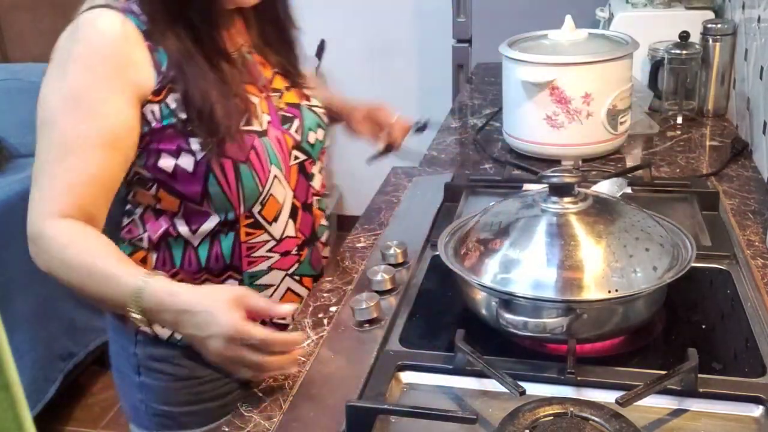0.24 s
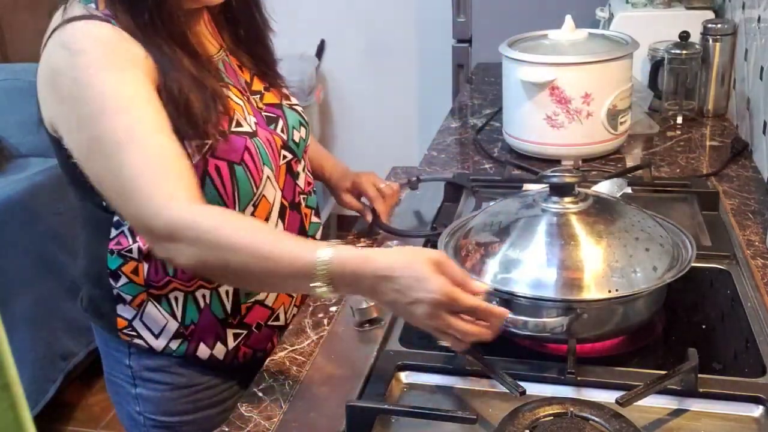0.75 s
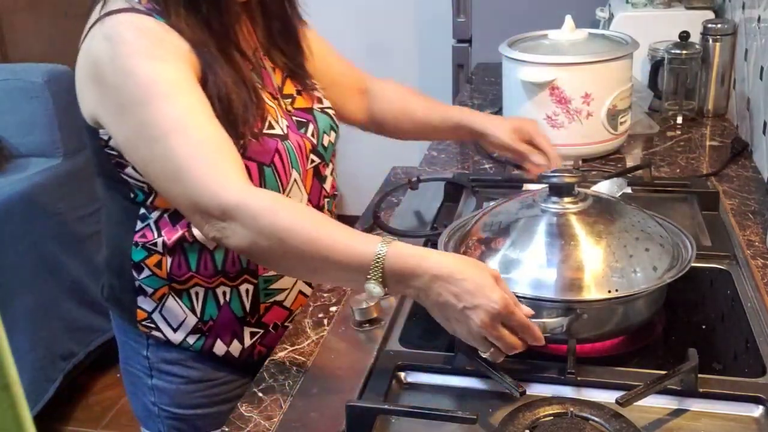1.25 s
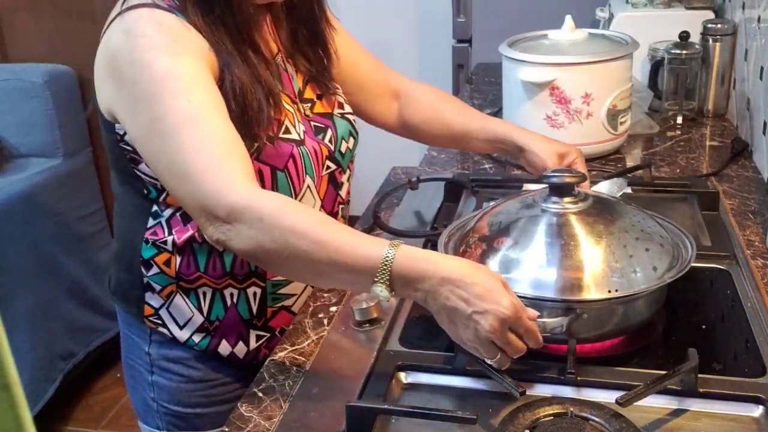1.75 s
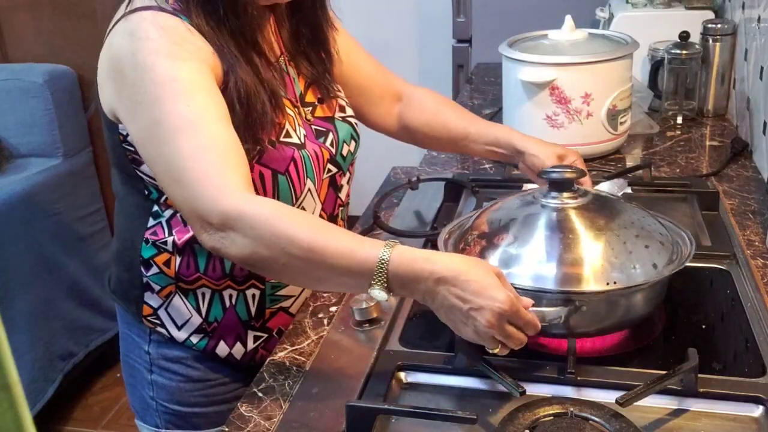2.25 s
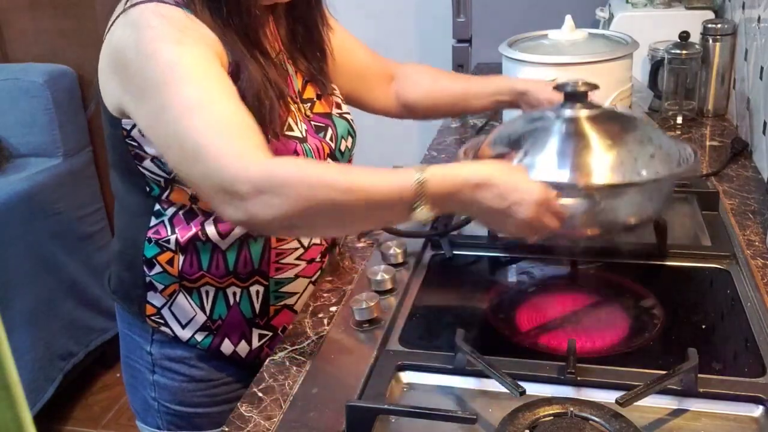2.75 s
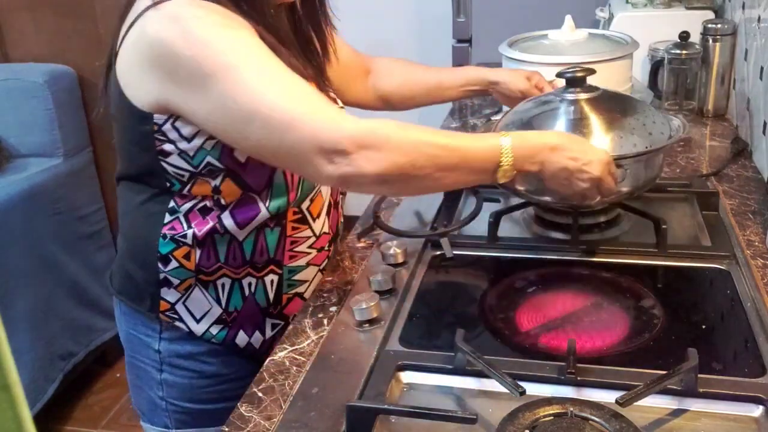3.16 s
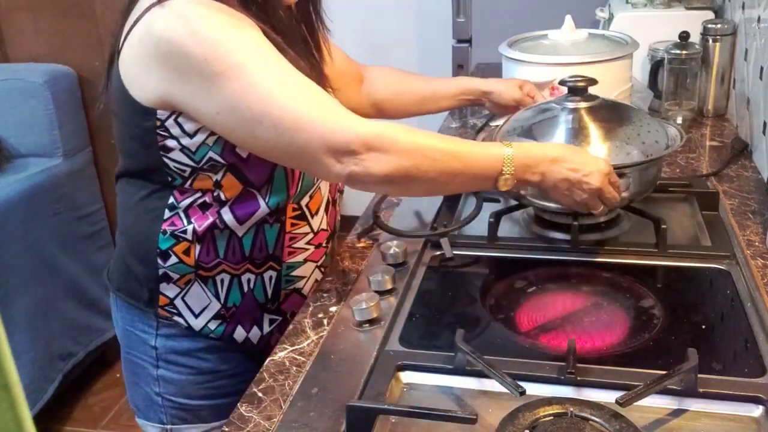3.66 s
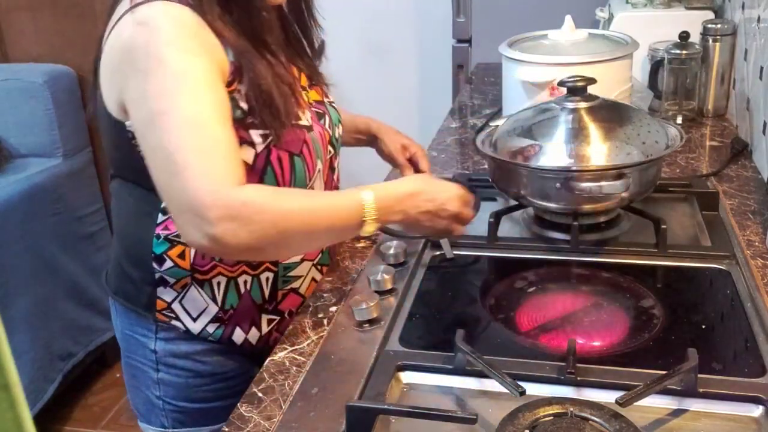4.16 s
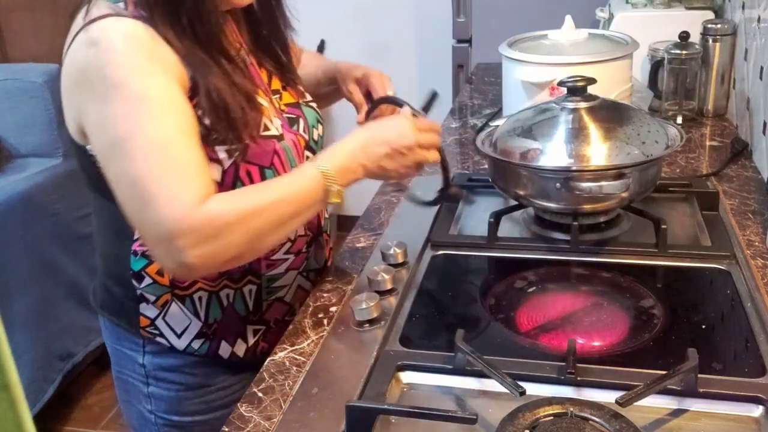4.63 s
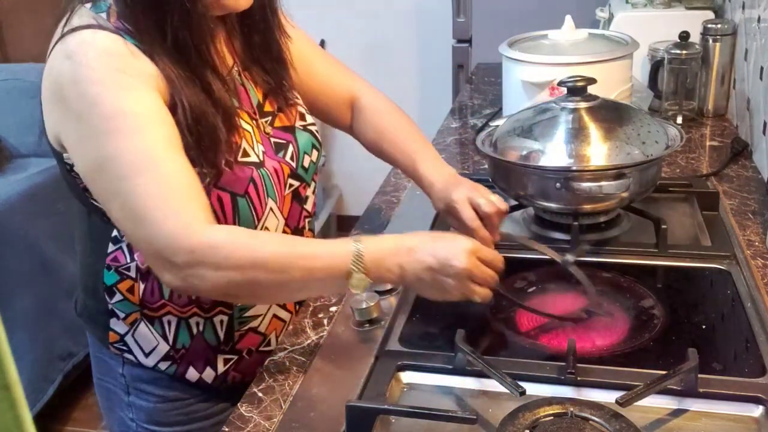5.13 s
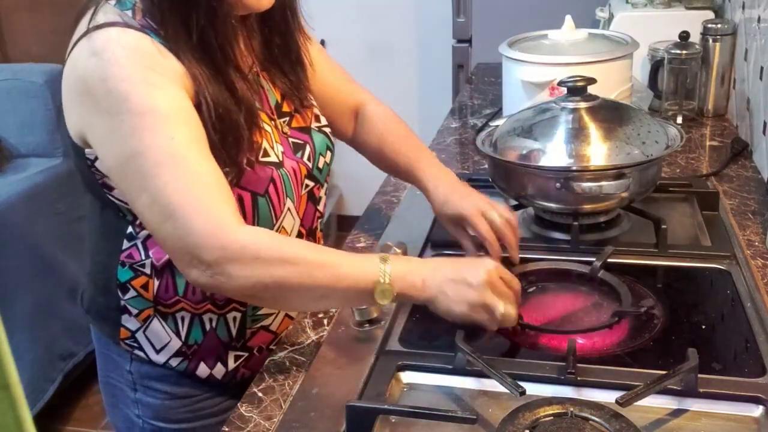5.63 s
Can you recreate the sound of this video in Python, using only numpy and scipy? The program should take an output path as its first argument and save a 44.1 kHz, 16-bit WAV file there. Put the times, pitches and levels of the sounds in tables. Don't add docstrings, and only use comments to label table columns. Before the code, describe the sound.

In a small tiled kitchen, a steel pot simmers with low, thudding bubbles and puffs of lid steam. An iron ring is pushed aside with a dull rattle. The pot is lifted, its boil dies away, and it lands with muffled knocks. The ring is picked up with clinks and a tap, then drops, bounces and falls flat with loud hard clanks. Close stereo microphone, slightly dull top, low room hum.

```python
import sys
import numpy as np
from scipy import signal
from scipy.fft import rfft, irfft, next_fast_len
from scipy.io import wavfile
from scipy.ndimage import uniform_filter1d

SR = 44100
rng = np.random.default_rng(int(sys.argv[2]) if len(sys.argv) > 2 else 0)


def materialize(psi):
    bounded = np.clip(np.atleast_2d(psi).T, -1, 1)
    quanta = np.round(bounded * 32767).astype(np.int16)
    wavfile.write(sys.argv[1], SR, quanta)


def decibels_to_gain(level_db):
    exponent = np.asarray(level_db, float) / 20
    return 10 ** exponent


N = 259749
TIME = np.arange(N) / SR


def evened(x):
    return x / np.sqrt(np.mean(x ** 2) + 1e-20)


def read(points, hz):
    f, value = np.transpose(points)
    return np.interp(np.log(hz + 1), np.log(f + 1), value)


def resonate(x, hz, width):
    r = np.exp(-np.pi * width / SR)
    return 2 * signal.lfilter([1 - r], [1, -r * np.exp(2j * np.pi * hz / SR)], x).real


def ringing(hz, db, t60, drive):
    t = np.arange(len(drive)) / SR
    phase = rng.random((len(hz), 1))
    decay = decibels_to_gain(db[:, None] - 60 * t / t60[:, None])
    modes = decay * np.sin(2 * np.pi * (hz[:, None] * t + phase))
    response = modes.sum(0) * np.minimum(t / 0.0011, 1)
    out = signal.oaconvolve(drive, response)[:len(t)]
    return out / np.sqrt(np.mean(out[:900] ** 2))


HOB_MODES = [104, 160, 243, 275, 314, 360, 390, 412, 445, 473, 516, 553, 583, 629]
HOB_UPPER_MODES = [690, 733, 776, 822, 880, 930, 1005, 1052, 1100, 1161, 1240, 1305, 1380, 1450]
# (frequency [Hz], T60 [s])
PANEL_DECAY = [(80, .13), (300, 0.092), (700, 0.061), (1400, 0.11)]


def knocks(rows, body, crack_db, ring_db, hold, chatter, rattle_db=-25, rattle_s=0.074,
           rise=0.0027, spread=.002):
    out = np.zeros(N + SR)
    panel, metal, colour = body
    t = np.arange(SR // 4) / SR
    hz = np.fft.rfftfreq(SR // 4, 1 / SR)
    fade = np.exp(-t / np.clip(chatter, .001, .06))
    release = np.minimum((t[-1] - t) / .06, 1)
    metal_hz, metal_db, metal_t60 = np.repeat(metal, 3, axis=0).T
    metal_hz = metal_hz * (1 + spread * rng.standard_normal(len(metal_hz)))
    metal_t60 = np.clip(0.45 * metal_t60, .02, .45)
    panel_hz = np.tile(HOB_MODES + HOB_UPPER_MODES, 2)
    slow = np.repeat([0, 1], len(panel_hz) // 2)
    panel_db = read(panel, panel_hz) - 12 * slow
    panel_t60 = np.clip(hold * read(PANEL_DECAY, panel_hz), .02, .25) * 1.7 ** slow
    for s, thump_db, clink_db, bright_hz in rows:
        grit = rng.standard_normal(len(t))
        contacts = rng.random(len(t)) < 700 / SR
        drive = (t == 0) + .2 * fade * grit * contacts
        thump = ringing(panel_hz, panel_db, panel_t60, drive)
        thump *= np.minimum(t / 0.0031, 1)
        spot_db = 11 * np.exp(-((hz - bright_hz) / 390.0) ** 2)
        spectrum = rfft(grit) * decibels_to_gain(read(colour, hz))
        crack = evened(irfft(spectrum * decibels_to_gain(spot_db), len(t)))
        rattle = evened(irfft(spectrum * decibels_to_gain(spot_db / 2), len(t)))
        crack = fade * crack + decibels_to_gain(rattle_db) * np.exp(-t / rattle_s) * rattle
        crack *= np.minimum(t / rise, 1)
        ring = ringing(metal_hz, metal_db + np.interp(metal_hz, hz, spot_db) * .7, metal_t60, drive)
        clink = decibels_to_gain(ring_db) * ring + decibels_to_gain(crack_db) * crack
        out[round(s * SR):][:len(t)] += (decibels_to_gain(thump_db) * thump + decibels_to_gain(clink_db) * clink) * release
    return out[:N]


# panel colour (frequency [Hz], level [dB]),
# metal modes (frequency [Hz], level [dB], T60 [s]), crack colour (frequency [Hz], level [dB]).
DROP_KNOCKS = [
    (5.311, -10.5, -23, 2946),
    (5.324, -15.5, -36, 1770),
    (5.335, -35, -52.5, 4400),
    (5.381, -42.5, -52, 2900),
]
DROP_BODY = [
    [(70, -21.5), (110, -11.5), (200, -0.5), (250, -8), (360, -6), (480, -0.5), (620, -3), (735, -6.5), (825, -9), (1005, -13.5), (1080, -17.5), (1165, -13.5), (1300, -54.5), (1820, -43)],
    [(1818, -2.5, 0.27), (1976, -6, .15), (2185, -1, .4), (2614, 0, 0.38), (2976, 4, 0.17), (3680, -2.5, 0.31), (4900, -4, .3), (5300, -14, .3), (5670, 5, 0.17), (6384, -2, 0.24), (6655, -14.5, .6), (7640, -8.5, 0.31)],
    [(820, -50), (1450, -31.5), (1800, -1.5), (2250, -16), (2850, -10), (3300, -13), (4650, -7), (6610, -7.5), (7520, -6), (8700, -17)],
]
BOUNCE_KNOCKS = [
    (5.4565, -13, -24, 6600),
    (5.478, -18.5, -35, 1850),
    (5.487, -21, -44, 4500),
    (5.495, -32.5, -44, 6700),
    (5.507, -30.5, -40.5, 2400),
]
BOUNCE_BODY = [
    [(70, -17.5), (110, -1), (200, -10.5), (250, 0.5), (360, 1), (480, -1), (640, -2.5), (735, -8), (825, -2.5), (1005, -17.5), (1165, -9.5), (1300, -36.5), (1820, -40)],
    [(1740, -2, 0.52), (1850, -4.5, .15), (2730, 2.5, 0.28), (2900, 8, 0.33), (3530, -4, .5), (4820, 9, .2), (5250, 1, .2), (5330, -10, 0.99), (6600, 2, 0.16), (6800, -6.5, 0.34), (7200, -16.5, 0.24), (7200, -5.5, .6), (7300, 3.5, .3)],
    [(820, -43), (1450, -16), (1800, -7.5), (2250, -16), (2850, -8.5), (3300, -12), (4300, -11), (6610, -14.5), (7520, -9), (8700, -14)],
]
REST_KNOCKS = [
    (5.7465, -48, -61, 3500),
    (5.759, -13, -21, 6500),
    (5.768, -22.5, -27.5, 6650),
    (5.778, -24, -31, 7150),
    (5.8, -26.5, -36, 6550),
    (5.809, -24, -37.5, 6650),
]
REST_BODY = [
    [(70, -11), (165, -12.5), (200, -14), (240, 0.5), (311, -33), (358, 2), (430, -9), (515, -1), (730, -9.5), (870, -5), (1050, -10.5), (1400, -43.5), (1820, -35.5)],
    [(1920, -2.5, .4), (2220, -11, 0.47), (2580, -7.5, 0.34), (3023, -13.5, .5), (3660, -13, .5), (4600, -16, .7), (4870, -27, 0.36), (5780, -16, .5), (5862, -4, .3), (6550, -7.5, 0.13), (6670, 6.5, 0.21), (7370, -6, 0.35), (7504, -26, .5)],
    [(820, -46), (1400, -4), (2230, -7), (2810, -7.5), (3120, -8.5), (5250, -3.5), (6810, -6.5), (7640, 3.5), (8700, -58)],
]


def ring_dropped():
    drop = knocks(DROP_KNOCKS, DROP_BODY, 12.7, -8.5, 0.91, 0.0025, rise=0.0012, spread=0.0066)
    bounce = knocks(BOUNCE_KNOCKS, BOUNCE_BODY, 9.1, -15.5, 0.68, 0.0044)
    rest = knocks(REST_KNOCKS, REST_BODY, 8.2, -11, 0.67, 0.0038, rise=0.0015)
    return drop + bounce + rest


TOUCH_KNOCKS = [
    (3.237, -47, -64, 5160),
    (3.264, -40.5, -68, 5580),
]
TOUCH_BODY = [
    [(88, -42), (150, -13.5), (258, -3), (412, -22), (582, -61), (792, -45), (1030, -37.5), (1400, -58), (1820, -78)],
    [(1850, -19, .2), (2223, -11, 0.17), (2970, -7, 0.17), (3900, -3.5, 0.15), (4565, -14, .2), (4900, -5.5, .25), (5140, -5, .3), (5561, -18, .3), (5970, -14.5, .2), (6250, 1.5, 0.2), (6480, -4, 0.32), (6702, -12, .23), (7477, -3, .3)],
    [(820, -58), (1400, -29.5), (2960, -17), (3440, -23), (5090, 13), (7590, -6), (8500, -42)],
]
DOWN_KNOCKS = [(3.528, -28.5, -49.5, 6950), (3.539, -26.5, -41, 6700), (3.553, -14.5, -40.5, 3040),
               (3.566, -23.5, -37.5, 6700), (3.584, -31.5, -40, 7300), (3.628, -35, -40.5, 7100),
               (3.639, -32.5, -51, 3340), (3.676, -27.5, -47, 6500), (3.719, -27, -38.5, 7200),
               (3.731, -19.5, -33.5, 6730), (3.746, -28, -54, 3300), (3.776, -34.5, -43.5, 7300),
               (3.813, -49, -49.5, 5950)]
DOWN_BODY = [
    [(70, -8), (170, -19.5), (315, 2), (353, -7), (395, -1.5), (470, -13.5), (580, -23), (711, -22.5), (1000, -27), (1400, -38.5), (1820, -70)],
    [(3040, -6.5, 0.41), (3220, -16, .1), (4500, -0.5, 0.23), (5055, -0.5, .4), (5669, -1, 0.57), (5900, -2.5, .35), (6550, -1.5, .5), (6750, -9, .35), (7000, -11.5, 0.55), (7060, -14, 0.44), (7330, 2.5, 0.46), (7620, -4.5, 0.83)],
    [(820, -38), (1400, -12), (2100, -17), (2960, -15), (4720, -15), (5060, -11.5), (7020, -10.5), (7820, -4), (8700, -62)],
]
SETTLE_KNOCKS = [
    (3.931, -29, -51.5, 7400),
    (4.004, -58.5, -96, 2200),
]
SETTLE_BODY = [
    [(88, -39), (160, -34.5), (243, 7), (314, -2), (393, 8.5), (535, -31), (730, -23.5), (880, -37), (1050, -26.5), (1400, -41), (1820, -86)],
    [(2970, -8, 0.29), (5920, -16, 0.123), (6740, 1, 0.3), (6900, -3.5, 0.54), (7400, -11, 0.17)],
    [(820, -43), (1400, -25), (3650, -8.5), (6730, -2), (8500, -22)],
]


def pot_set_down():
    touch = knocks(TOUCH_KNOCKS, TOUCH_BODY, 0, -0.5, 0.87, 0.026, rise=0.0045, spread=0.015)
    down = knocks(DOWN_KNOCKS, DOWN_BODY, 0, -10, 0.54, 0.026, rise=.007, spread=0.0055)
    settle = knocks(SETTLE_KNOCKS, SETTLE_BODY, 0, -10.5, 2.1, 0.0053, rise=0.0038)
    return touch + down + settle


ASIDE_KNOCKS = [
    (0.76, -26.5, -29.5, 7230),
    (0.803, -22, -40.5, 3100),
    (0.813, -25, -51.5, 1680),
    (0.834, -30, -42, 6780),
    (0.836, -43.5, -49, 3350),
    (0.897, -27, -51, 6900),
]
ASIDE_BODY = [
    [(70, -13.5), (139, 0), (208, -6), (285, -0.5), (400, -4), (527, -8), (767, -10.5), (1400, -41.5), (1820, -68.5)],
    [(1707, -13.5, 1.1), (2740, -13, 0.39), (3100, -21, 0.29), (3483, -16.5, 0.67), (3960, -13.5, 1), (4420, -10, .45), (4495, -4.5, 0.7), (4970, -9.5, .5), (5450, -15.5, 1.2), (5390, -7.5, 0.52), (6100, -6.5, 0.5), (6330, -8, .5), (6754, -4, 0.4), (7020, -9, 0.27), (7230, 5, 0.22)],
    [(710, -43.5), (1200, -8), (3800, -9), (4370, -12.5), (5080, -11.5), (7010, -6), (7620, 2), (8700, -72)],
]


def ring_pushed_aside():
    return knocks(ASIDE_KNOCKS, ASIDE_BODY, -7, 1, 2.37, 0.024, rattle_db=-6.0, rattle_s=0.15, spread=0.0045)


BRUSH_KNOCKS = [
    (4.281, -46.5, -65, 7430),
    (4.292, -38, -59, 7420),
    (4.302, -44, -74, 5400),
    (4.344, -47, -76.5, 2400),
]
BRUSH_BODY = [
    [(88, -41.5), (150, 4), (404, -4), (663, -12), (784, -15.5), (883, -33), (1010, -9.5), (1200, -27.5), (1600, -33), (2080, -81.5)],
    [(2400, -2, 0.62), (3235, -16, 0.27), (3680, -7.5, .2), (4450, -8.5, 0.33), (5330, -18, .22), (5460, 1, .2), (6540, -27.5, .2), (7850, 4.5, .3), (7400, -4.5, .2)],
    [(940, -45), (1600, 7.5), (6250, -3.5), (7650, 5), (8500, -31.5)],
]
UP_KNOCKS = [
    (4.449, -23, -42, 3200),
    (4.456, -23.5, -31.5, 5340),
    (4.462, -22.5, -33, 2600),
    (4.476, -23.5, -48.5, 4600),
    (4.494, -34.5, -62, 4600),
    (4.521, -48.5, -59, 4600),
]
UP_BODY = [
    [(70, -33.5), (150, -7.5), (248, -0.5), (314, -8), (390, 1), (500, -12.5), (703, -10.5), (900, -24.5), (1160, -33), (1400, -41), (1820, -59.5)],
    [(1590, -8.5, 0.44), (2210, -2.5, 0.22), (2500, 7, 0.2), (3100, -5, .3), (3280, -10, 0.17), (3655, -12, 0.69), (4500, 6.5, .3), (5090, -9, .3), (5870, 0, 0.24), (6040, -13.5, .6), (6900, -7, .6), (8100, -1.5, 0.33)],
    [(820, -21), (1400, -10.5), (1900, -9), (2560, -9), (3300, -7.5), (4510, -8), (7520, -14), (8700, -48.5)],
]
TAP_KNOCKS = [
    (4.5806, -17, -24.5, 2700),
    (4.607, -26.5, -53, 2500),
    (4.66, -41, -83, 2500),
    (4.789, -52, -79, 2580),
]
TAP_BODY = [
    [(70, -31.5), (156, -5), (200, -6.5), (248, -2.5), (314, -12.5), (370, -2), (500, -4.5), (630, -9), (880, -19.5), (1000, -32), (1160, -13.5), (1400, -47)],
    [(2100, -16, 0.64), (2265, -11, 0.53), (2500, -24, 0.47), (2600, -11.5, 0.24), (2802, 12.5, .05), (2993, 7.5, 0.036), (6700, 0, 0.21), (7740, 0.5, 0.32)],
    [(820, -28.5), (1400, -17.5), (1900, -13.5), (2400, -2.5), (3000, -10.5), (4510, -14.5), (7000, -13), (7600, -4), (8700, -48)],
]


def ring_picked_up():
    brush = knocks(BRUSH_KNOCKS, BRUSH_BODY, -10.0, -2.5, 1.3, 0.029, rise=.004, spread=0.0056)
    up = knocks(UP_KNOCKS, UP_BODY, 3.2, -10, 0.54, 0.0045)
    tap = knocks(TAP_KNOCKS, TAP_BODY, 3.9, -13, 0.64, 0.0034, rattle_db=-27, rattle_s=.06,
                 rise=0.0023, spread=0.0099)
    return brush + up + tap


TICK_KNOCKS = [
    (2.057, -44, -59, 1500),
]


def lid_tick():
    return knocks(TICK_KNOCKS, BRUSH_BODY, 2.6, -25, 0.31, 0.0038)


# (time [s], frequency [Hz], level [dB], length [s])
RUBS = [(2.434, 1380, -70, 0.027), (2.436, 1660, -76, 0.039), (2.495, 2390, -83, 0.058),
        (2.607, 6330, -87, 0.043), (2.865, 1794, -83.5, 0.054), (2.94, 1050, -82, 0.077),
        (5.103, 993, -76.5, 0.076), (5.236, 2580, -71, 0.12), (5.265, 1878, -68, 0.092)]


def squeaks():
    out = np.zeros(N)
    for s, hz, db, length in RUBS:
        grit = rng.standard_normal(SR // 4)[:round(length * SR)]
        tone = evened(resonate(resonate(grit, hz, 25), hz, 40))
        out[round(s * SR):][:len(tone)] += decibels_to_gain(db) * tone * np.hanning(len(tone))
    return out


def bubbles(modes, per_s, spread_db):
    size = decibels_to_gain(spread_db * np.minimum(rng.exponential(1, N), 3)) * (rng.random(N) < per_s / SR)
    out = 0
    for hz, width, db in modes:
        ring = resonate(size * rng.standard_normal(N), hz, width)
        for _ in range(2):
            ring = resonate(ring, hz, 1.87 * width)
        out = out + decibels_to_gain(db) * evened(ring)
    return evened(out)


def steady(x, seconds):
    window = round(seconds * SR)
    power = uniform_filter1d(uniform_filter1d(x ** 2, window), window)
    return x / np.sqrt(abs(power) + 1e-12)


def swells(rows, rise, fall_db, axis):
    rows = np.array(rows)
    since = TIME - rows[:, :1]
    fall = decibels_to_gain(rows[:, axis, None] - fall_db * np.maximum(since, 0))
    each = fall * np.clip(1 + since / rise, 0, 1)
    return np.sqrt((each ** 2).sum(0))


def cooling():
    return decibels_to_gain(-90 * np.maximum(TIME - 3.2, 0))


# (time [s], flutter level [dB], steam level [dB], rim hiss level [dB])
LID_BURPS = [(0.0, -71, -85, -71), (0.14, -93, -90, -73.5), (0.3, -73, -71, -75), (0.46, -77.5, -57, -73),
             (0.59, -69.5, -78, -86), (0.65, -75, -60.5, -69.5), (1.06, -66, -66, -71.5),
             (1.25, -75, -68, -77), (1.34, -78.5, -65, -83), (1.67, -70, -66.5, -76),
             (1.76, -100, -64, -75.5), (1.92, -79, -66, -103), (2.07, -60, -81, -83),
             (2.12, -73, -63, -79.5), (2.24, -71, -61.5, -76.5), (2.34, -68.5, -86, -88.5),
             (2.52, -73, -71.5, -99), (2.62, -71, -78, -110)]
BURP_RISE_S = 0.05
# (time [s], level [dB])
BOIL_LEVEL = [
    (0.0, -45),
    (2.46, -45.5),
    (2.72, -51.5),
    (2.85, -50.5),
    (3.07, -68.5),
    (3.12, -55.5),
    (3.2, -69.5),
]
# (frequency [Hz], width [Hz], level [dB])
POT_MODES = [(122, 48, -2.5), (152.5, 32, -11.5), (248.5, 47.7, 3.5), (316.3, 83, -1.5), (383, 42, -9),
             (375.6, 70, -3.5), (457.2, 38, -11.5), (483, 23, -15.5)]
# (frequency [Hz], width [Hz], level [dB])
LID_MODES = [(770, 120, -13), (832.5, 110, 7.5), (944, 250, 0.5), (1050, 40, -9.5)]


def boiling():
    vigour = decibels_to_gain(np.interp(TIME, *np.transpose(BOIL_LEVEL)))
    boil = vigour * steady(bubbles(POT_MODES, 220, 0.91), 0.22)
    boil += swells(LID_BURPS, BURP_RISE_S, 114, axis=1) * bubbles(LID_MODES, 120, 2.2)
    dull = signal.sosfilt(signal.butter(4, 330., fs=SR, output="sos"), boil)
    boil += np.clip((TIME - 2.9) / 0.095, 0, 1) * (dull - boil)
    return boil * cooling()


# (frequency [Hz], left-right likeness)
LIKENESS = [(60, 0.93), (160, 0.88), (430, 0.76), (1160, -0.25), (3110, -0.067), (8330, -0.18)]
# (frequency [Hz], left minus right [dB])
PORT_LEAN = [(60, -0.5), (200, 4.5), (450, 3.5), (750, 0.5), (1100, -3), (1600, -0.5), (2500, 1), (3700, 1),
             (5200, 7), (6800, 9), (8000, 1)]


def noise(colour, streak_db, puff_db, size):
    hz = np.fft.rfftfreq(size, 1 / SR)
    a, b, c, d, streaks, puffs = rng.standard_normal((N * 4 // size + 5, len(hz), 6)).T
    streaks = evened(uniform_filter1d(uniform_filter1d(streaks, size=3, axis=0), size=30, axis=1))
    puffs = evened(uniform_filter1d(uniform_filter1d(puffs, size=70, axis=0), size=5, axis=1))
    same = np.clip(read(LIKENESS, hz), -1, 1)[:, None]
    left = a + 1j * b
    z = np.array([left, same * left + np.sqrt(1 - same ** 2) * (c + 1j * d)])
    lean_db = read(PORT_LEAN, hz)[:, None] * [[[.5]], [[-.5]]]
    z = z * decibels_to_gain(read(colour, hz)[:, None] + lean_db + streak_db * streaks + puff_db * puffs)
    return evened(signal.istft(z, nperseg=size, noverlap=size * 3 // 4)[1][:, :N])


# (frequency [Hz], level [dB])
STEAM_COLOUR = [(1940, -55.5), (3300, -23), (3870, -19.5), (4580, -17), (5120, -14.5), (5820, -13.5),
                (6200, -6), (6500, -9.5), (6870, -1), (7200, -6), (7890, -10), (8300, -24), (10800, -79.5)]
# (frequency [Hz], level [dB])
RIM_COLOUR = [(680, -37), (1150, -9), (1560, -22.5), (1700, -4), (1960, -10), (2540, 4.5), (3230, -15),
              (4550, -53.5)]


def steam_hiss():
    seal = decibels_to_gain(-170 * np.clip(TIME - 2.41, 0, .11))
    jet = np.hypot(decibels_to_gain(-74), swells(LID_BURPS, BURP_RISE_S, 57, axis=2))
    steam = seal * jet * noise(STEAM_COLOUR, 5, 2.2, size=1024)
    steam += swells(LID_BURPS, BURP_RISE_S, 49, axis=3) * noise(RIM_COLOUR, 3.9, 1.7, size=1024)
    return steam * cooling()


# (time [s], level [dB])
JOLTS = [
    (0.0, -47.5),
    (1.6, -55),
    (2.84, -46),
    (5.22, -65.5),
]
# (frequency [Hz], level [dB])
HUM_SPECTRUM = [(20, -10), (48, -41.5), (75, -18.5), (85, -13), (107, 8), (147, -13), (184, -13.5),
                (231, -29.5), (600, -42.5), (780, -71.5)]


def room_hum():
    level = np.hypot(decibels_to_gain(-58), swells(JOLTS, 0.024, 42.5, axis=1))
    return level * steady(noise(HUM_SPECTRUM, 6.0, 0.41, size=2048), 0.22)


# (frequency [Hz], left lead [rad])
PORT_LEAD = [(60, 0.036), (200, 0.1), (450, 0.26), (750, 0.82), (1100, 1.2), (2500, 0.99), (8000, 1)]
# (frequency [Hz], level [dB])
NEAR_ECHOES = [(300, -34.5), (700, -7), (1200, -6.5), (2500, -3.5), (8000, -2.5)]


def ports(x):
    size = next_fast_len(N + 4096)
    hz = np.fft.rfftfreq(size, 1 / SR)
    half = decibels_to_gain(read(PORT_LEAN, hz) / 2) * np.exp(.5j * read(PORT_LEAD, hz))
    taps = np.zeros((2, size))
    at = rng.integers(8, 600, (2, 30))
    np.put_along_axis(taps, at, rng.choice([-1., 1.], (2, 30)) / np.sqrt(60), 1)
    echo = decibels_to_gain(read(NEAR_ECHOES, hz)) * rfft(taps.sum(0))
    response = np.array([half, 1 / half]) + np.array([[1], [-1]]) * echo
    return irfft(rfft(x, size) * response, size)[:, :N]


# (frequency [Hz], T60 [s])
ROOM_DECAY = [(100, 0.78), (260, 0.38), (600, 0.45), (1100, 0.43), (1840, 0.5), (4850, 0.24), (8000, 0.32)]


def kitchen(x):
    taps = np.zeros((2, SR))
    at = np.arange(200, SR - 20, 20) + rng.integers(0, 20, (2, (SR - 201) // 20))
    np.put_along_axis(taps, at, rng.choice([-1., 1.], at.shape), 1)
    hz, t, z = signal.stft(taps, SR, nperseg=512)
    same = np.clip(read(LIKENESS, hz), -1, 1)[:, None]
    z = np.array([z[0], same * z[0] + np.sqrt(1 - same ** 2) * z[1]])
    lean_db = np.outer([.5, -.5], read(PORT_LEAN, hz))[:, :, None]
    z = z * decibels_to_gain(-60 * t / read(ROOM_DECAY, hz)[:, None] + lean_db)
    tail = signal.istft(z, SR, nperseg=512)[1]
    return signal.fftconvolve(x[None], tail / np.linalg.norm(tail[0]), axes=1)[:, :N]


def scene():
    metal = ring_pushed_aside() + lid_tick() + squeaks()
    metal += pot_set_down() + ring_picked_up() + ring_dropped()
    metal = signal.sosfilt(signal.butter(3, 75., "highpass", fs=SR, output="sos"), metal)
    boil = boiling()
    direct = ports(decibels_to_gain(-4.0) * metal + boil)
    reverberant = kitchen(decibels_to_gain(-11.0) * metal + decibels_to_gain(-8.5) * boil)
    return direct + reverberant + steam_hiss() + room_hum()


def top_cut(x):
    return signal.sosfilt(signal.butter(12, 8930, fs=SR, output="sos"), x)


def record(dry):
    limit = signal.butter(18, 7450, fs=SR, output="sos")
    soft = 1.381 * np.tanh(signal.sosfilt(limit, dry) / 1.633)
    guard = signal.firwin(151, 9200, window=("kaiser", 7.0), fs=SR)
    hiss = decibels_to_gain(-91) * rng.standard_normal(dry.shape)
    mix = signal.oaconvolve(soft, guard[None], "same") + hiss
    return top_cut(mix)


dry = scene()
out = record(dry)
materialize(out)
```